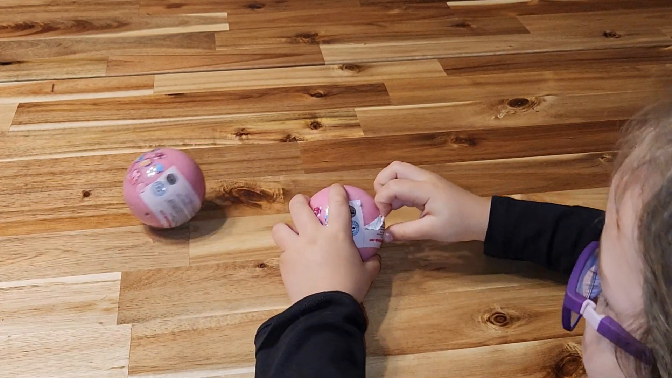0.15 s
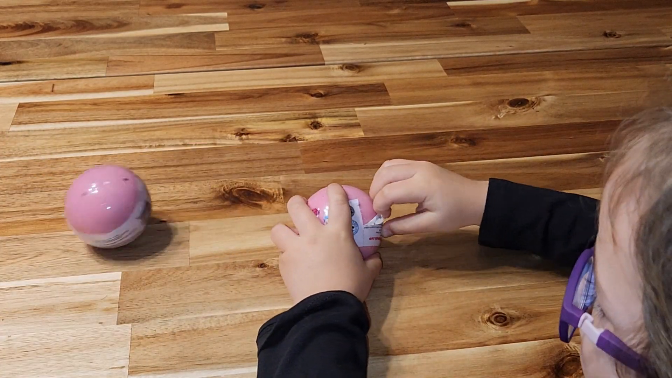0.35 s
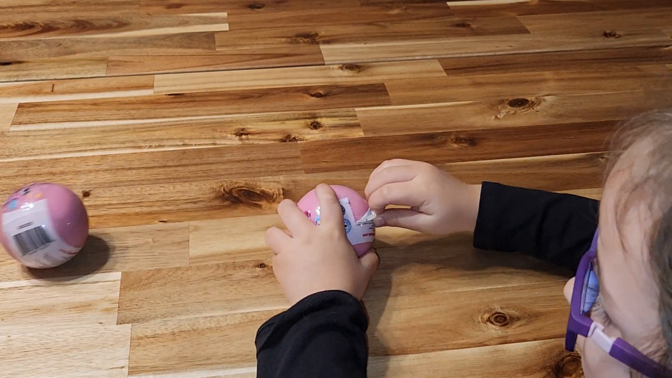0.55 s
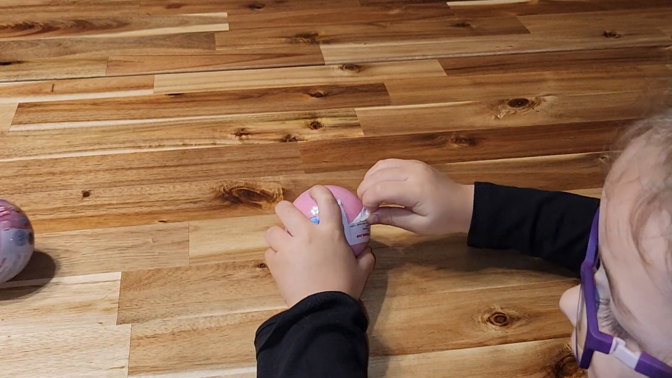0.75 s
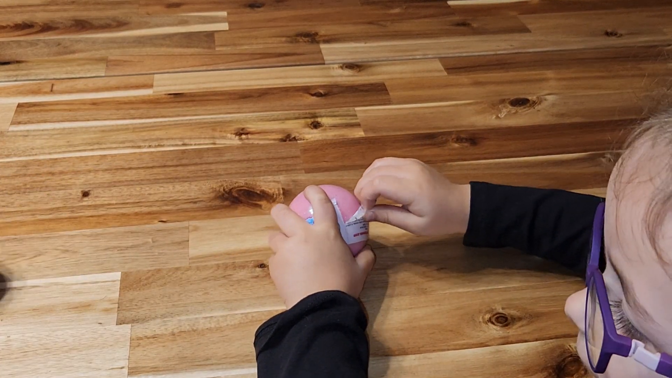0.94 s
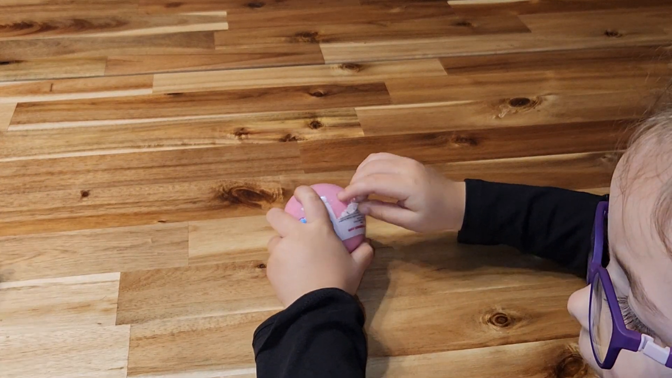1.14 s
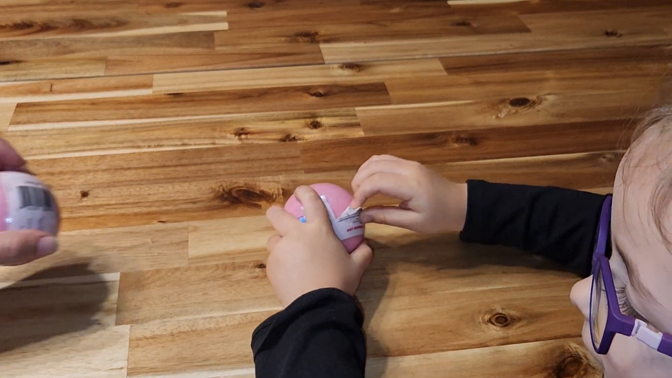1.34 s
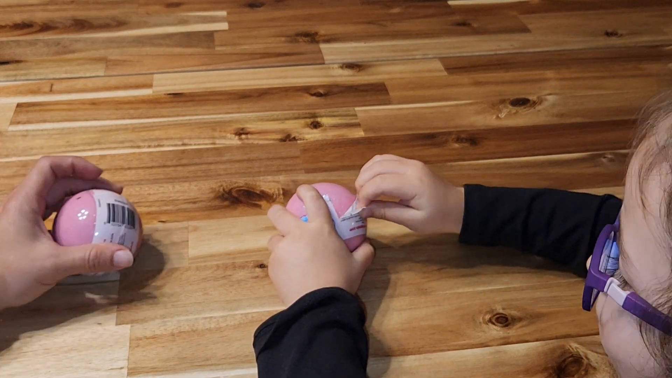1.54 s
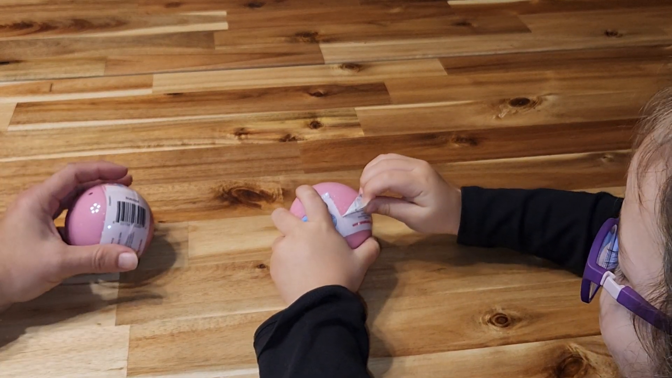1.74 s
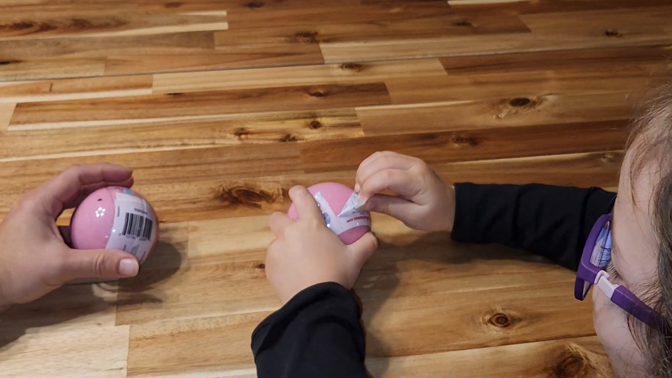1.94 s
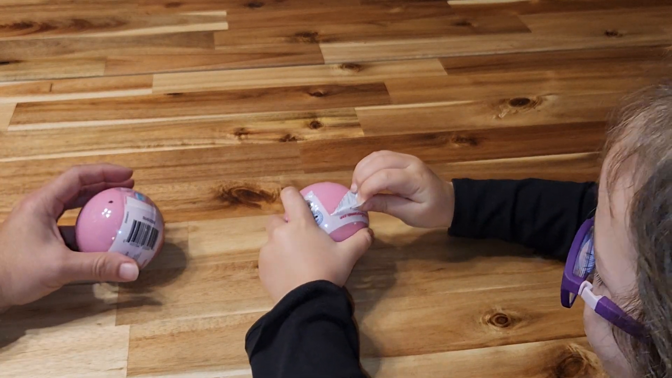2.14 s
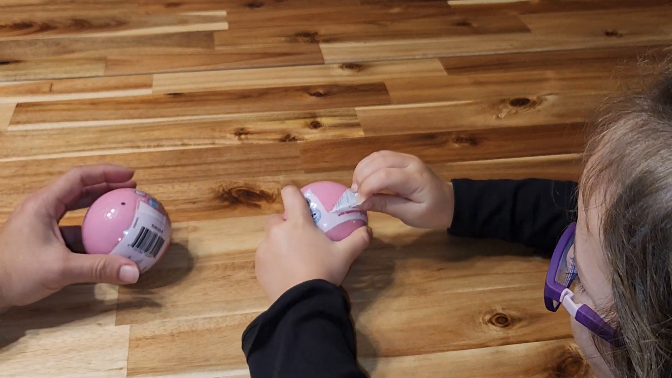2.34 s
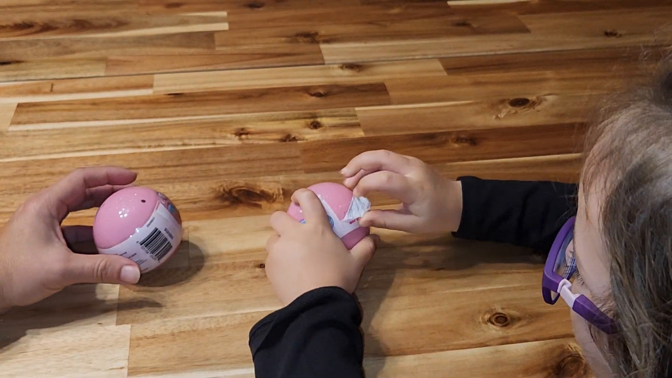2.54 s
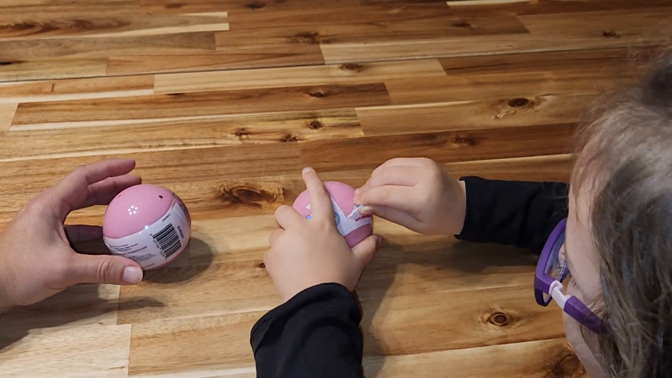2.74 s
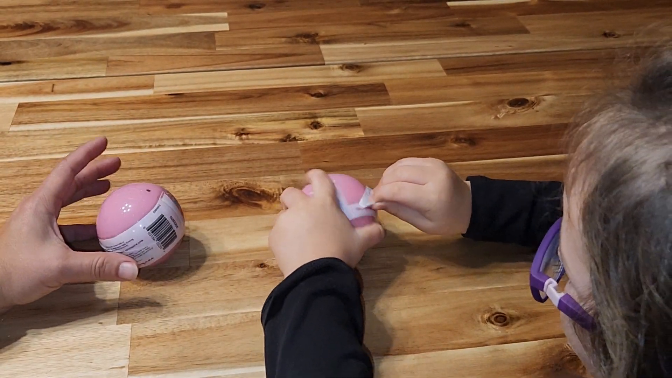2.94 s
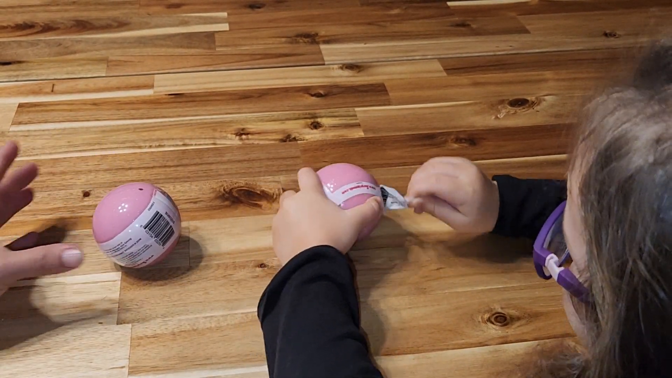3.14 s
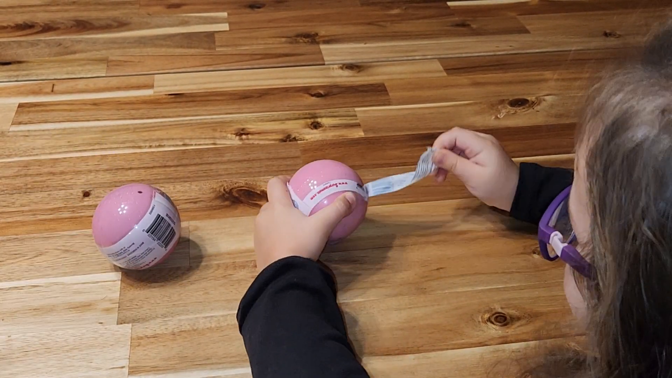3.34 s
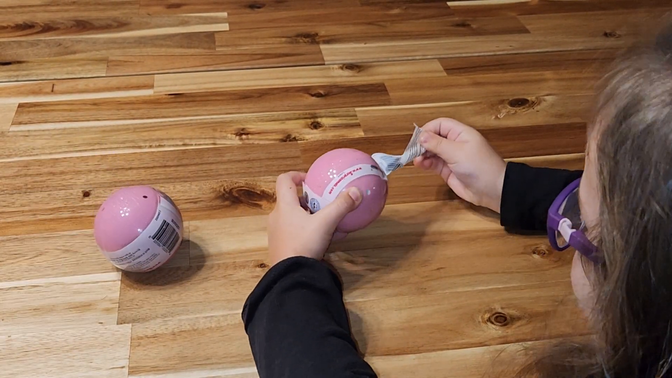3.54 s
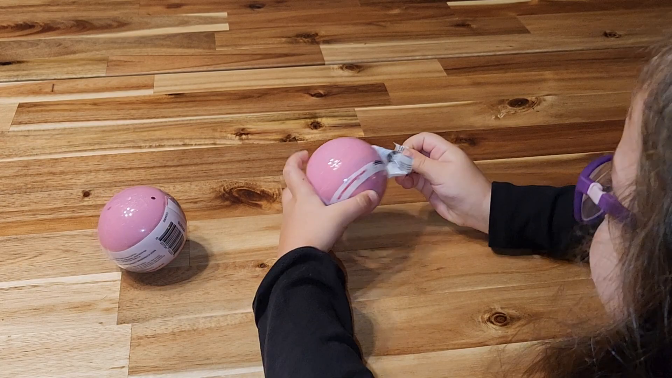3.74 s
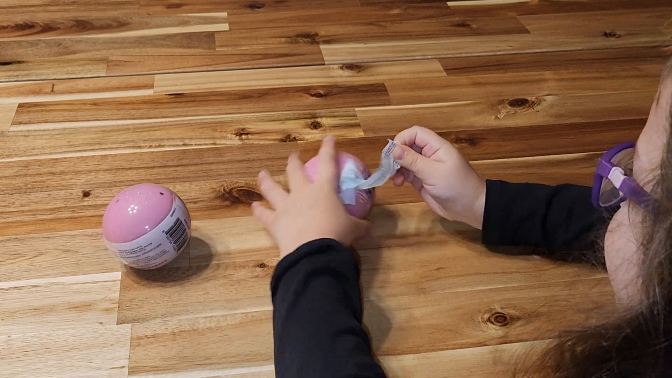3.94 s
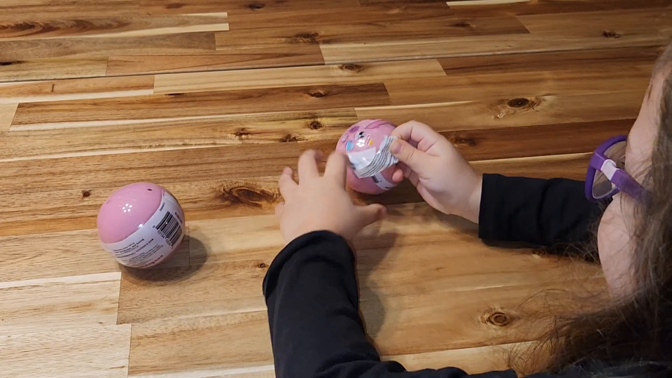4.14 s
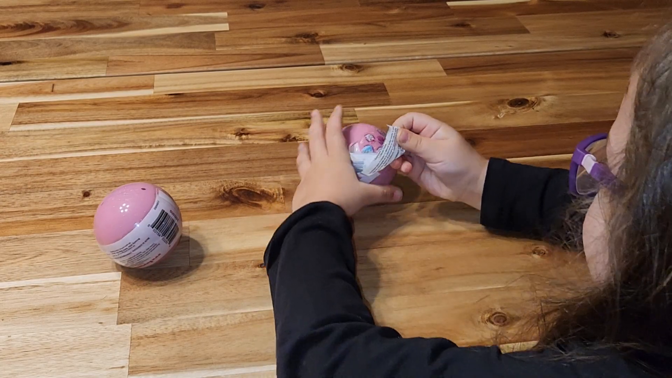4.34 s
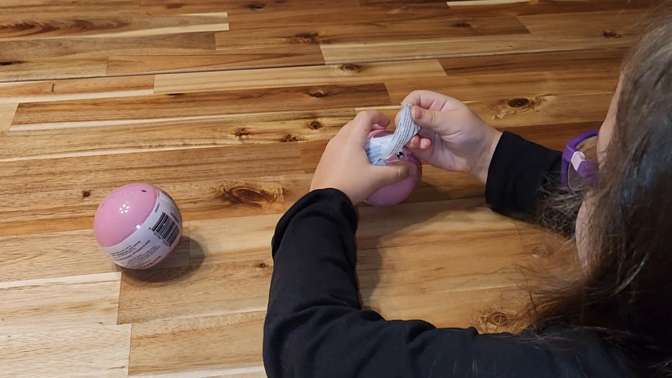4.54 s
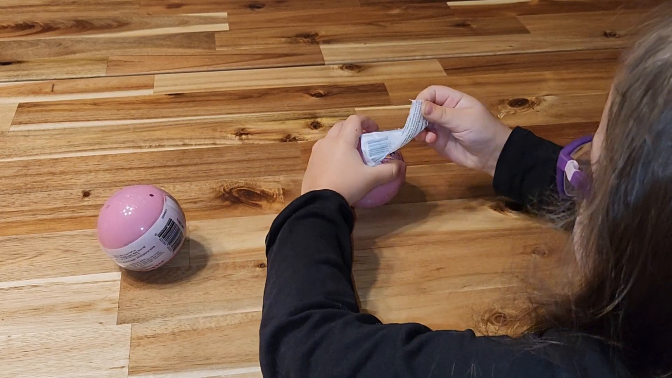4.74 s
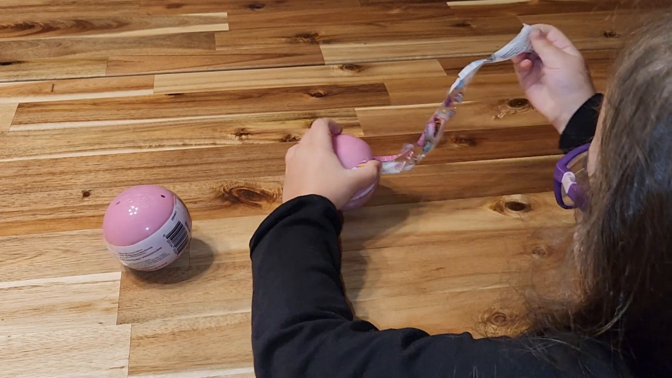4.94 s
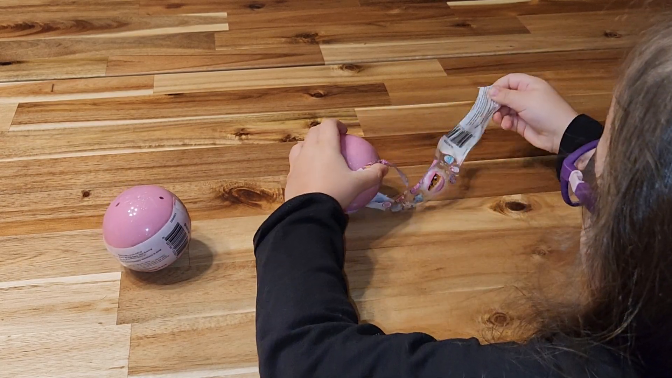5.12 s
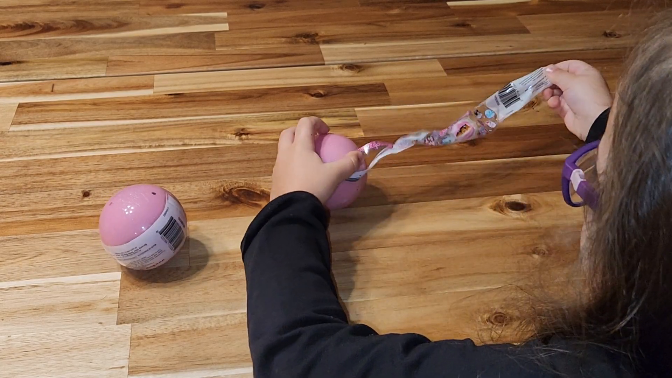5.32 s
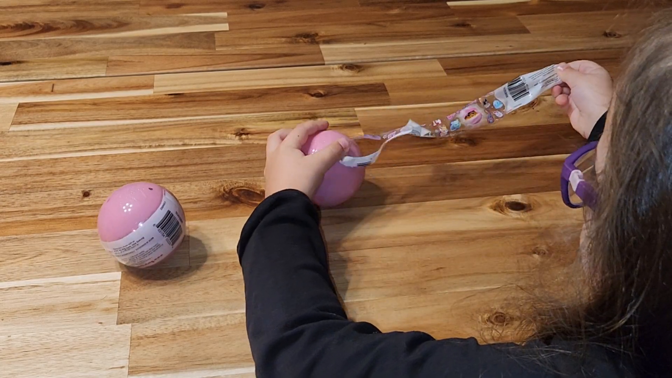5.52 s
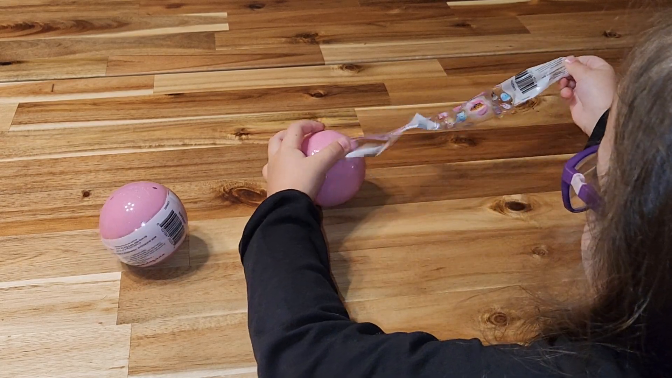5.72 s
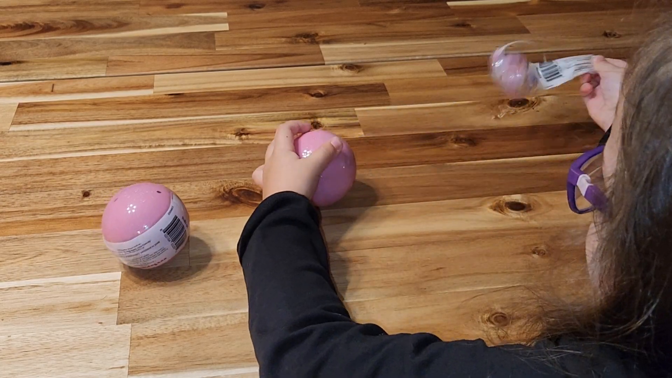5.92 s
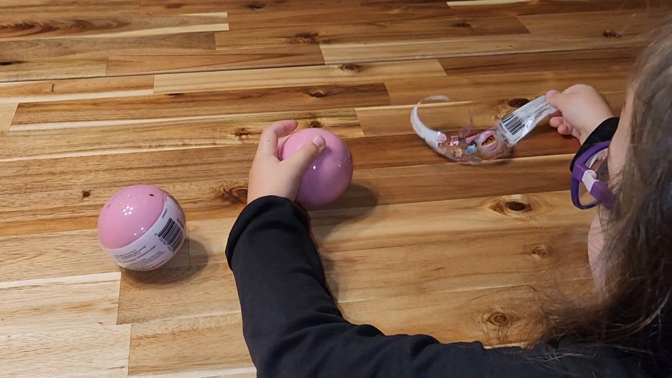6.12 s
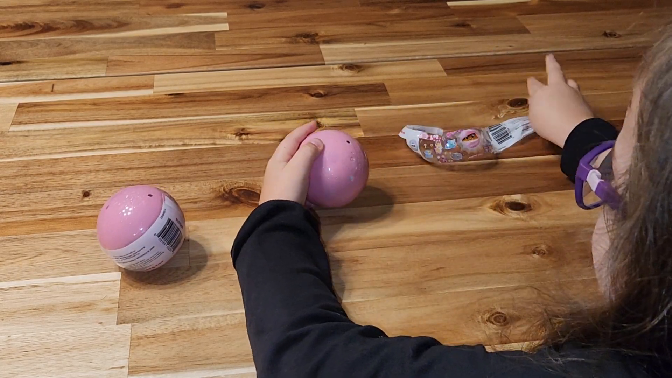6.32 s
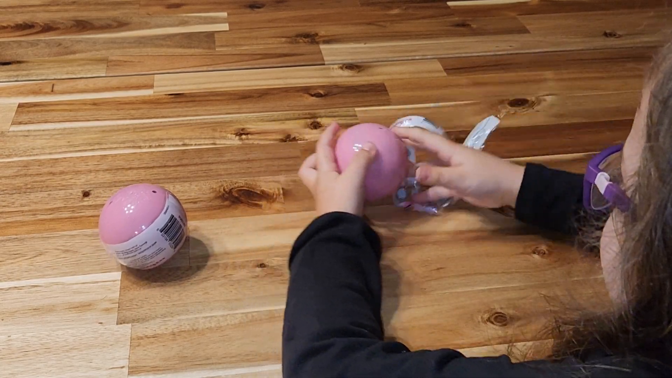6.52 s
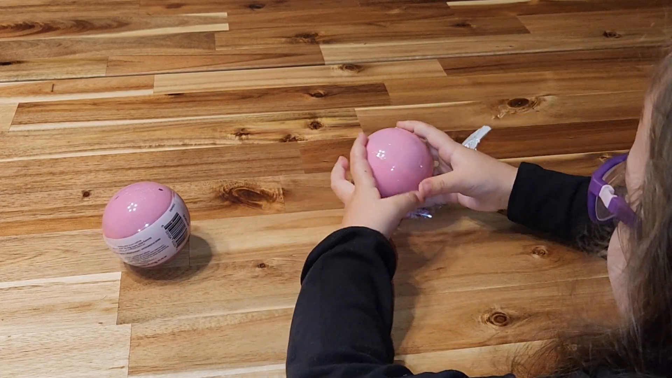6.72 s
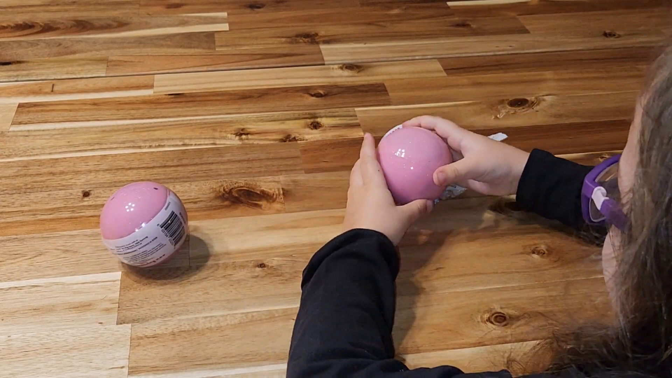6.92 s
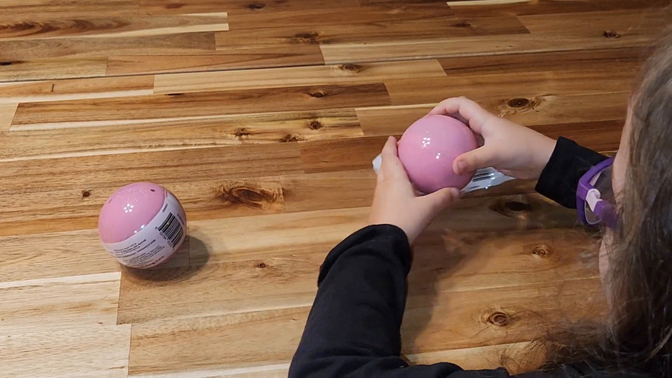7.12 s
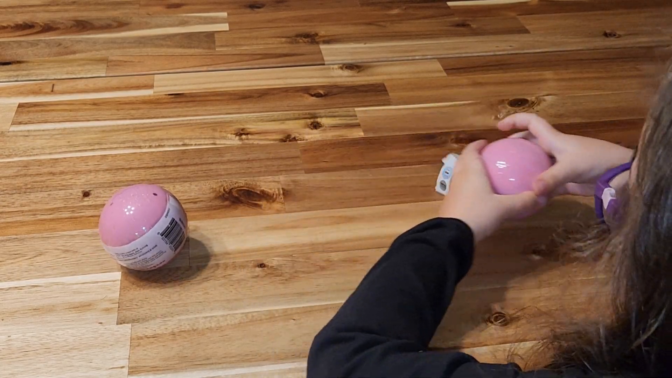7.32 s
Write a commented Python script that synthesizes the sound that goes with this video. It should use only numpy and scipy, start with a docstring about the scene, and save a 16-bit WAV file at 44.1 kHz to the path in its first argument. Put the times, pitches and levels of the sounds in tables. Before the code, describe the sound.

Thin stiff wrapper is peeled from a plastic ball on a wooden table. Dry, bright ticks are scattered at first, then crackles and rustles crowd together in several pulls, with hollow shell knocks among them. The loudest tear comes late, followed by lighter crinkling. Near microphone, short room reflections, faint low hum and soft floor thumps.

```python
"""Stiff plastic film snaps, crackles and rustles as small hands peel it off a hollow toy capsule on a wooden table.
Snaps and crackles are short noise bursts in three ringing bands; the rustle is patchy, fluttering noise.
Knocks ring the modes of shell and table top; a second capsule rolls faintly as a wavering narrow band.
A small room answers with single echoes and a tail; slow floor thumps and a quiet hum lie underneath.
A two-port microphone hears it all up close."""
import sys
import numpy as np
from scipy import signal
from scipy.io import wavfile
from scipy.ndimage import uniform_filter1d

SR = 44100
rng = np.random.default_rng(int(sys.argv[2]) if len(sys.argv) > 2 else 0)


def to_wav(s):
    """Save 16-bit WAV."""
    ch = np.atleast_2d(s).T  # columns
    pcm = np.round(np.clip(ch, -1, 1) * 32767)  # PCM
    wavfile.write(sys.argv[1], SR, pcm.astype(np.int16))


N = 325017  # samples in the scene

# The clearest buckles and tears of the film, part levels against the middle part:
# (time [s], peak level [dB], low part [dB], top part [dB], low ring [Hz], middle ring [Hz])
SNAPS = [(0.1456, -35.5, -17, 29, 3000, 7550), (0.3177, -48, 0, 0, 2180, 5530),
         (0.4325, -7, -26, 13.5, 3120, 4380), (0.438, -26.5, -14, 4.5, 3060, 5400),
         (0.4492, -23, -22, 24, 3180, 5350), (0.5477, -34.5, -6, 24, 1300, 8050),
         (0.9563, -22, -15, 13, 1980, 7950), (1.258, -16, -5.5, 2, 1080, 4200),
         (1.2603, -19.5, -7.5, -11, 1000, 7410), (1.499, -46.5, -12, -23, 2350, 5460),
         (1.5643, -40, -11, 4, 2380, 3550), (1.6066, -13.5, -7, 13.5, 3220, 3670),
         (1.7859, -19.5, -15, -1, 2200, 6700), (1.8679, -19.5, -7, 5.5, 2180, 6250),
         (1.9358, -13, -6.5, 13.5, 2130, 6160), (2.0651, -11, -13, 10.5, 1810, 6100),
         (2.141, -21, -3, 6, 3010, 3280), (2.1693, -28, -12, 0, 2960, 8250),
         (2.1861, -14.5, 0, 4.5, 2800, 7120), (2.5027, -45, 6, -13, 2770, 7610),
         (2.5115, -45, 4, -12, 2810, 7630), (2.5327, -31, -10, 10, 2780, 8400),
         (2.5721, -39, -8, 5, 3200, 3530), (2.6053, -36, -5, -3, 3200, 6940),
         (2.6114, -34, -4, -3, 1480, 4100), (2.6165, -29, -4, 5, 1560, 6380),
         (2.6396, -23, -11, 3.5, 1420, 7550), (2.7287, -26, -7.5, -7, 1810, 5760),
         (2.7914, -39.5, -8, 3, 2190, 7870), (2.8422, -17.5, -17, -4, 3060, 7060),
         (3.0459, -25.5, -14, 10, 2950, 7600), (3.0517, -22, -15, 11, 1940, 3730),
         (3.076, -17.5, -16, -2, 1720, 5500), (3.0853, -11.5, -18, 2, 3060, 5000),
         (3.0924, -5.5, -4.5, 2, 1680, 5670), (3.1131, -7, -6.5, -2, 1510, 6470),
         (3.1154, -5.5, -7.5, 1, 2080, 6550), (3.132, -14, -5, -9, 1410, 6970),
         (3.1371, -5.5, -8, -5, 1560, 5200), (3.142, -13.5, -8, -2, 1410, 6220),
         (3.1806, -18.5, -26, -2, 2140, 3680), (3.198, -19, -14, -4, 2920, 7540),
         (3.2124, -23, -13, -5, 1660, 4990), (3.239, -22.5, -10, -13, 1570, 7200),
         (3.2417, -16.5, -15, -10, 1310, 6060), (3.2512, -26, -4, -6, 2090, 5190),
         (3.2627, -27, 0, 9, 1520, 5210), (3.2902, -26.5, -6, 4, 1270, 5520),
         (3.3148, -26.5, -3, 0, 1560, 7540), (3.3702, -23.5, -11, -16, 1680, 6300),
         (3.3854, -20, -12.5, -16, 1570, 7000), (3.4075, -17.5, -8, -12, 1740, 5900),
         (3.4404, -17.5, -6, -6, 1800, 5340), (3.477, -13, 0, 6.5, 2000, 4170),
         (3.5008, -27, 0, -3, 1640, 5260), (3.5232, -23, -22, -6, 1690, 5550),
         (3.5708, -27.5, -25, -5, 1460, 7000), (3.5872, -32, -8, -3, 2990, 3330),
         (3.6558, -43.5, 3, -13, 1720, 3330), (3.7365, -36.5, -9, -13, 1710, 6630),
         (3.7834, -13.5, -4.5, 2.5, 1650, 6160), (3.804, -6, -8.5, 10.5, 2060, 6200),
         (3.8445, -22, -12, 7, 2100, 5160), (3.864, -21.5, -2.5, -1, 2080, 5770),
         (3.928, -26.5, -4, -1, 2170, 5300), (3.9424, -26, -8, -4, 2430, 6450),
         (3.9512, -14, -2.5, -13, 1130, 6150), (3.9681, -17.5, -13, -1, 1390, 4800),
         (3.972, -18.5, -7, -3, 1560, 5850), (3.99, -24, -10, 0, 1400, 5940),
         (4.0887, -20.5, -19, -16, 3130, 4600), (4.0976, -19, -29, 2, 1490, 6320),
         (4.1053, -12.5, -12, -11, 1620, 7460), (4.1507, -6.5, -6.5, 6.5, 3000, 6100),
         (4.218, -22.5, -23, -4, 1260, 7810), (4.237, -18.5, -17, -1, 2580, 6280),
         (4.2567, -12, -15, 1.5, 2900, 5730), (4.2776, -19.5, -8, 5, 3010, 4870),
         (4.2848, -13.5, -8.5, -5, 2920, 5800), (4.3393, -31, -10, 0, 1540, 7820),
         (4.4305, -21.5, -18, -3, 1850, 5060), (4.5097, -21.5, -11, 5, 1670, 5220),
         (4.5871, -29.5, -4, -13, 2010, 5550), (4.6092, -35, -5, -3, 3180, 5130),
         (4.6576, -28, -11, -13, 3140, 5800), (4.6934, -27.5, 3, -4, 2390, 5090),
         (4.7184, -34.5, -2.5, -2.5, 3180, 3310), (4.8285, -22.5, -9, -27, 2280, 6730),
         (4.864, -26, -9, -4, 1570, 3970), (4.8858, -21.5, -16, -7, 3090, 3300),
         (4.8901, -22, -4.5, -2.5, 2640, 5350), (4.9207, -2, -11.5, 4.5, 3100, 6100),
         (4.9456, -9, -12, 6, 3040, 5150), (4.9918, -8.5, -8, 3, 3000, 4850),
         (5.0003, -6.5, -6, -5, 2250, 7400), (5.0418, -8, -14, -18, 1680, 6700),
         (5.1101, -24, -8.5, 0, 1280, 5820), (5.1312, -26, -11, 0, 2340, 5590),
         (5.1911, -14, -37, -3, 3270, 5700), (5.2455, -22, -22, -22, 2100, 5500),
         (5.3388, -24, -11, -18, 2620, 4650), (5.3652, -29, -16, -10, 2260, 5640),
         (5.4106, -12, -34, -34, 2000, 6140), (5.447, -15.5, -12, 4.5, 2010, 3650),
         (5.4583, -19.5, -16, -4, 1220, 6200), (5.559, -14, -18, 11, 3030, 4770),
         (5.5638, -12.5, -15, 3, 2170, 6760), (5.665, -32.5, -14, 0, 1460, 6760),
         (5.6758, -30, -12.5, 0, 2010, 5350), (5.8192, -40.5, -4, -2, 2380, 5330),
         (5.8672, -11, -22, 3, 1570, 4860), (5.874, -12, -11, 5.5, 1960, 5650),
         (5.917, -18, -31, 7, 2150, 5080), (5.9388, -19, -13, -15, 2250, 4760),
         (6.0761, -38.5, -4, -9, 1230, 5350), (6.1378, -18, -7, -4, 2870, 6800),
         (6.2198, -33, 2, 0, 2770, 3320), (6.329, -25, -11, 9.5, 2820, 3660),
         (6.3883, -39, -10, 8, 3030, 3370), (6.414, -32.5, -5, 10, 3020, 4720),
         (6.562, -39, 1, 2, 2800, 5160), (6.6853, -21, -6, -1, 1500, 5560),
         (7.1766, -24, -5, 3.5, 2480, 5320), (7.185, -27.5, -8, 19, 2010, 5470)]
# Ring-down of a snap: (low part t60 [s], middle part t60 [s], top part t60 [s])
SNAP_T60 = (0.011, 0.0092, 0.012)
# Spectral width of a snap: (low part [octaves], middle part [octaves], top part [octaves])
RING_OCTAVES = (.2, .36, .42)
# Likeness of a snap at the two ports: (low part [0-1], middle part [0-1], top part [0-1])
PORTS_ALIKE = (1, 0.45, 0.73)
TOP_HZ = 11940  # centre of the top part
SNAP_LEFT_DB, SNAP_SCATTER_DB = 2.0, 1.4  # left minus right: mean and spread over the snaps

# Spells of pulling and fingering, top and low part against the middle part:
# (start [s], rise [s], hold [s], level [dB], top part [dB], low part [dB], share of separate crackles [0-1])
SPELLS = [(0, 0.0035, 0.097, -71, 10, 6, 1), (0.411, 0.0063, 0.079, -79, 30, 14, 1),
          (0.694, 0.0089, 0.024, -87, -2, -3, 0.6), (1.597, 0.017, 0.015, -45.5, 6, -3, 0.73),
          (1.773, .01, 0.012, -50, 3, -16, 0.2), (1.922, 0.011, .02, -50, 2, -24, .5),
          (2.075, .11, .03, -50.5, -21, -2.5, 0.23), (2.515, 0.11, 0.03, -56.5, -3, -13.5, 1),
          (2.824, 0.0087, .02, -55.5, -5, -14, 0.3), (3.045, 0.07, 0.045, -38, 2.5, 1.5, .5),
          (3.17, .02, 0.12, -47.5, 1, -3.5, .6), (3.36, 0.014, 0.13, -46, -2, -6, 1),
          (3.495, .02, .08, -57, -11, -3, 0.5), (3.6, .02, .08, -70, -16, 2, 0.3),
          (3.726, 0.05, 0.086, -48.5, -4, -7.5, 0.14), (3.907, 0.048, 0.037, -48, -2.5, 4, 1),
          (4.075, 0.024, 0.054, -45.5, -3, -1.5, 0.6), (4.187, 0.084, 0.015, -45, 3, 2, .4),
          (4.43, 0.014, 0.31, -64, 0.5, -0.5, 0.87), (4.816, 0.016, 0.11, -56, 5.5, 4, 1),
          (4.917, 0.0081, 0.11, -32, -4.5, -3.5, 0.24), (5.075, 0.018, 0.1, -49.5, 0.5, -6.5, 0.6),
          (5.312, 0.028, .11, -46, 1, -2.5, 0.58), (5.539, .015, 0.024, -51.5, 9.5, 1.5, .8),
          (5.784, 0.045, .05, -70, 12, -3, 0.5), (5.861, 0.0044, 0.073, -43.5, -2.5, -9, 0.02),
          (6.035, 0.02, 0.032, -59, 0, -1, 0.84), (6.127, 0.0086, 0.14, -55, -4, -1, 0),
          (6.303, 0.015, 0.062, -52, 0, -6, .1), (6.45, 0.028, .09, -71, -5, -2, 0.1),
          (6.553, .01, 0.12, -46, 0.5, -7.5, 0.78), (6.75, 0.014, .02, -57, -9, -12, .4),
          (6.888, 0.012, 0.023, -62.5, 1.5, -18, .4), (7.04, .05, .03, -66.5, 4, -4, .3),
          (7.119, 0.15, 0.016, -52, -1, -2.5, 0), (7.334, 0.0082, 0.011, -52.5, -10, 7.5, 0)]
# A spell starts 16 dB down, swells to its level, then dies away evenly
RISE_FROM_DB, SETTLE_DB_PER_S = -16, 296.5
CRACKLES_PER_S = 900  # on average
# Centres of the rustle: (low part [Hz], middle part [Hz])
RUSTLE_HZ = (2300, 5440)

# The capsule meets the table: (time [s], peak level [dB], hardness [dB per octave])
KNOCKS = [(.7, -34, -1.5), (1.257, -18.5, 17.5), (1.625, -18, 1), (3.143, -24, 6.5), (3.411, -34, -10),
          (3.803, -38, -16), (3.952, -14.5, -1.5), (4.105, -32, -9.5), (4.153, -24.5, 5),
          (4.336, -38.5, -16), (4.921, -24, 9), (5.001, -27, 2), (5.041, -26.5, 10), (5.247, -32.5, 22.5),
          (5.446, -38.5, -4)]
# Modes of shell and table top, before each blow varies them: (frequency [Hz], level [dB], t60 [s])
CAPSULE = [(117, -10, 0.028), (165, -20.5, 0.18), (254, -12.5, 0.086), (410, -4, 0.21), (470, 5.5, 0.032),
           (606, 10.5, 0.11), (705, 3, 0.023), (902, 13, 0.018), (1100, 5, 0.011), (1420, -6, .025),
           (1750, -7, .02), (2200, -12.5, 0.037)]
# The second capsule rolls over the boards: (time [s], level [dB], ring [Hz])
ROLL = [(0, -76, 2300), (.3, -63, 2150), (.41, -68.5, 2050), (.5, -78.5, 2100), (.9, -72, 1980)]

# Dull low thumps through the floor: (time [s], envelope peak [dB], frequency [Hz])
THUMPS = [(.715, -46.5, 29), (1.044, -36, 27.6), (2.078, -45, 49.7), (4.771, -41.5, 38.5)]
# Spectral shape of the hum, relative: (frequency [Hz], density [dB per Hz])
HUM = [(11, -48.5), (18, -18), (59, 5.5), (114, -5.5), (170, -2.5), (366, -8), (486, -14), (645, -13.5),
       (1110, -22.5), (1240, -17.5), (1700, -24), (3870, -24), (7640, -28.5), (14700, -36), (16000, -39.5)]
HUM_DB = -53.5  # rms level of the hum before panning
# Hum at the two ports: (frequency [Hz], left-right likeness [-1 to 1])
HUM_SAME = [(60, 0.97), (180, 0.99), (550, 0.7), (1650, 0.086), (4970, 0.02), (15000, 0.07)]

# Single echoes, before the three turning tails weight them: (delay [ms], left level [dB], right level [dB])
ECHOES = [(1.328, -28.5, -24), (5.583, -16, -21), (7.27, -13, -33.5), (8.16, -45.5, -37.5),
          (9.39, -16.5, -21), (11.43, -27, -20), (17.14, -19, -27), (33.62, -23, -23)]
# Decay of the room tail: (frequency [Hz], t60 [s])
ROOM = [(200, 0.3), (800, 0.27), (2000, 0.32), (5500, 0.26), (15000, 0.2)]
# Strength of the room tail: (frequency [Hz], energy against the direct sound [dB])
ROOM_DB = [(200, 0.5), (1000, -5.5), (4000, -4), (15000, -10)]
# Room tail at the two ports: (frequency [Hz], left-right likeness [-1 to 1])
ROOM_SAME = [(100, 1), (250, 1), (600, 0.74), (1500, -0.68), (4000, -0.42), (12000, 0.88)]

# Colour of the microphone: (frequency [Hz], gain [dB])
MICROPHONE = [(800, 0), (1500, -0.5), (2500, -2.5), (4000, -2.5), (6000, -1.5), (9000, -3.5), (12000, -3),
              (15750, -3), (16150, -22)]
LEFT_LEAD_S = 2.4e-5  # the left port is nearer to the hands
EDGE_HZ = 16900  # band limit
FULL_SCALE = .92  # ceiling of the input stage


def snaps():
    """Each buckle of the film flips over at once; the two ports see it from slightly different sides."""
    out = np.zeros((2, N))
    low_hz, middle_hz = np.transpose(SNAPS)[4:6]
    alike = np.clip(PORTS_ALIKE, 0, 1)[:, None, None]
    left = snap_shapes(low_hz, middle_hz)
    right = alike * left + np.sqrt(1 - alike ** 2) * snap_shapes(low_hz, middle_hz)
    pans_db = SNAP_LEFT_DB + SNAP_SCATTER_DB * rng.standard_normal(len(SNAPS))
    for k, (s, peak_db, low_db, top_db, _, _) in enumerate(SNAPS):
        share = gain_of([low_db, 0, top_db])
        burst = np.array([share @ left[:, k], share @ right[:, k]]) / np.linalg.norm(share)
        add(out, s, placed(gain_of(peak_db) * burst, pans_db[k]))
    return out


def snap_shapes(low_hz, middle_hz):
    """Bursts that start within about a millisecond and ring at their crease: three parts x events x samples."""
    t = np.arange(800) / SR
    noise = rng.standard_normal((len(low_hz), 800))
    centres = [low_hz, middle_hz, TOP_HZ + 0 * low_hz]
    onset = 1 - np.exp(-(t / 0.00032) ** 2)
    shapes = []
    for hz, octaves, t60 in zip(centres, RING_OCTAVES, SNAP_T60):
        burst = coloured(noise, hz, octaves) * onset * gain_of(-60 * t / t60)
        short_power = uniform_filter1d(2 * burst ** 2, size=30)
        shapes.append(burst / np.sqrt(short_power.max(-1, keepdims=True)))
    return np.array(shapes)


def handling():
    """Skin and film slide with a rustle while tiny creases, each with its own colour, crackle at random."""
    crackling, gliding = np.sqrt(spell_powers())
    size = gain_of(3.6 * np.minimum(rng.exponential(1, N), 4))
    size = size * (rng.random(N) < CRACKLES_PER_S / SR)
    crease = rng.integers(0, 24, N)  # which of 24 creases gives way
    low_hz = np.geomspace(1200, 2900, 24)
    middle_hz = rng.permutation(np.geomspace(3300, 7800, 24))
    shapes = snap_shapes(low_hz, middle_hz)
    shapes = shapes * gain_of(1.33 * rng.standard_normal((3, 24, 1)))
    sliding, out = rustle(patchy_db=3.0, flutter_db=4.5), np.zeros(N)
    for k, hz in enumerate(RUSTLE_HZ + (TOP_HZ,)):
        crackle = sum(signal.oaconvolve(size * (crease == c), shapes[k, c])[:N] for c in range(24))
        soft = coloured(sliding, hz, octaves=.5)[:N]
        out += crackling[k] * evened(crackle) + gliding[k] * soft
    return placed(out, pan_db=2.0)


def spell_powers():
    """Summed power of all spells, split by grain: crackle and slide x three parts x samples."""
    out, t = np.zeros((2, 3, N)), np.arange(SR) / SR
    for s, rise, hold, level_db, top_db, low_db, grain in SPELLS:
        rise, grain = max(rise, 1 / SR), np.clip(grain, 0, 1)
        swell_db = RISE_FROM_DB * np.maximum(1 - t / rise, 0)
        settle_db = -SETTLE_DB_PER_S * np.maximum(t - rise - hold, 0)
        parts_db = level_db + np.array([[low_db], [0], [top_db]])
        parts = gain_of(parts_db + swell_db + settle_db) ** 2
        add(out, max(s, 0), np.array([grain * parts, (1 - grain) * parts]))
    return out


def rustle(patchy_db, flutter_db):
    """Sliding noise whose colour shifts in patches and whose level flutters."""
    z = signal.stft(rng.standard_normal(N + 512), nperseg=256)[2]
    patches = uniform_filter1d(rng.standard_normal(z.shape), size=16, axis=1)
    patches = uniform_filter1d(patches, size=7, axis=0)
    flutter = uniform_filter1d(rng.standard_normal(z.shape[1]), size=6)
    z = z * gain_of(patchy_db * patches / patches.std() + flutter_db * evened(flutter))
    return signal.istft(z, nperseg=256)[1][:N + N % 2]  # an even length


def knocks():
    """A blow with a brief rattle rings shell and table top; a hard blow favours the upper modes."""
    out, t = np.zeros(N), np.arange(SR // 5) / SR
    for s, peak_db, hard_db in KNOCKS:
        hz, db, t60 = np.transpose(CAPSULE)[..., None]
        spot_db, grip = rng.standard_normal((2, len(hz), 1))  # every blow lands on another spot, in another grip
        hz = hz * (1 + .04 * grip)
        db = db + 3 * spot_db + hard_db * np.log2(hz / 500)
        modes = gain_of(db - 60 * t / t60) * np.sin(2 * np.pi * hz * t)
        blow = modes.sum(0)
        hits = rng.standard_normal(900) * (rng.random(900) < .03)
        rattle = 0.52 * hits * gain_of(-60 * t[:900] / 0.06)
        ring = blow + np.convolve(blow, rattle)[:len(t)]
        add(out, s, gain_of(peak_db) * ring / abs(ring).max())
    low_cut = signal.butter(N=2, Wn=80, btype="high", fs=SR, output="sos")
    radiated = signal.sosfilt(low_cut, out)
    return placed(radiated, pan_db=1.0)


def roll():
    """The grain of the wood shakes the rolling shell, which answers with a faint, wavering ring."""
    s, *columns = np.transpose(ROLL)
    level_db, hz = (np.interp(np.arange(N) / SR, s, c) for c in columns)
    bandwidth_hz = 150
    pole = np.exp(-np.pi * bandwidth_hz / SR)
    slow = signal.lfilter([1], [1, -pole], rng.standard_normal((2, N)))
    carrier = np.exp(2j * np.pi * np.cumsum(hz) / SR)
    ring = ((slow[0] + 1j * slow[1]) * carrier).real
    return placed(gain_of(level_db) * evened(ring), pan_db=3)


def thumps():
    """A few slow swings through the floor that swell for about one cycle and die away."""
    out, t = np.zeros(N), np.arange(SR // 2) / SR
    for s, peak_db, hz in THUMPS:
        u = t * hz / 1.05  # 1 at the envelope peak
        envelope = u * np.exp(1 - u)
        add(out, s, -gain_of(peak_db) * envelope * np.sin(2 * np.pi * hz * t))
    return out


def hum():
    """Steady room and microphone noise, slightly patchy, alike in both ports at the bottom."""
    frames, hz = N // 512 + 5, np.fft.rfftfreq(2048, 1 / SR)
    a, b, c, d, patches = rng.standard_normal((frames, 1025, 5)).T
    patches = uniform_filter1d(uniform_filter1d(patches, size=12, axis=0), size=8, axis=1)
    same = np.clip(read(HUM_SAME, hz), -1, 1)[:, None]
    left, other = a + 1j * b, c + 1j * d
    z = np.array([left, same * left + np.sqrt(1 - same ** 2) * other])
    z *= gain_of(read(HUM, hz)[:, None] + 1.1 * patches / patches.std())
    noise = signal.istft(z, nperseg=2048, noverlap=1536)[1][:, :N]
    return placed(gain_of(HUM_DB) * evened(noise), pan_db=1.4)


def room(x):
    """Direct sound reaches the left port first; three tails take turns smoothly: echoes waver 4.3 times a second."""
    even = N + N % 2
    hz = np.fft.rfftfreq(even, 1 / SR)
    delay = np.exp(-2j * np.pi * hz * LEFT_LEAD_S)
    right = np.fft.irfft(np.fft.rfft(x[1], even) * delay)[:N]
    turn = np.pi * np.arange(N) / SR * 4.3
    turns = [np.sqrt(2 / 3) * abs(np.cos(turn + k * np.pi / 3)) for k in range(3)]  # squares sum to 1
    echoes = sum(signal.fftconvolve((w * x.mean(0))[None], room_tail(), axes=1)[:, :N] for w in turns)
    return np.array([x[0], right]) + echoes


def room_tail():
    """Single echoes up to 34 ms, joined from 5 ms by sparse random taps that die band by band, alike at the bottom."""
    size, first, gap = SR // 2, 220, 12  # samples
    taps = np.zeros((2, size))
    slots = np.arange(first, size - gap, gap)
    at = slots + rng.integers(0, gap, (2, len(slots)))
    np.put_along_axis(taps, at, rng.choice([-1., 1.], at.shape), 1)
    hz, t, z = signal.stft(taps, SR, nperseg=512)
    same = np.clip(read(ROOM_SAME, hz), -1, 1)[:, None]
    t60 = read(ROOM, hz)[:, None]
    z = np.array([z[0], same * z[0] + np.sqrt(1 - same ** 2) * z[1]])
    z *= gain_of(-60 * t / t60)
    z *= gain_of(read(ROOM_DB, hz))[:, None] / np.sqrt(t60)
    tail = signal.istft(z, SR, nperseg=512)[1][:, :size]
    tail *= np.sqrt(gap * 6 * np.log(10) / SR)  # tap density and decay turned into energy
    tail[:, :first] = 0
    for ms, *db in ECHOES:
        at = round(ms * SR / 1000) + rng.integers(0, 4, 2)  # the ports hear a wall up to 3 samples apart
        tail[[0, 1], at] += gain_of(db)
    return tail


def coloured(noise, centre_hz, octaves):
    """Keeps a bell-shaped band of each row of noise."""
    hz = np.fft.rfftfreq(noise.shape[-1], 1 / SR) + 1
    away = np.log2(hz / np.asarray(centre_hz)[..., None]) / octaves
    bell = np.exp(-.5 * away ** 2) + 0.33 * np.exp(-.5 * (away / 4) ** 2)  # a peak on a broad foot
    return evened(np.fft.irfft(np.fft.rfft(noise) * bell, noise.shape[-1]))


def gain_of(db):
    """Decibels to a factor."""
    return 10 ** (np.asarray(db) / 20)


def evened(x):
    """Scales the last axis to rms 1."""
    return x / np.sqrt(np.mean(x ** 2, -1, keepdims=True) + 1e-20)


def read(points, hz):
    """Reads a (frequency [Hz], value) table on a log axis."""
    f, value = np.transpose(points)
    return np.interp(np.log(hz + 1), np.log(f + 1), value)


def add(mix, s, sound):
    """Mixes a sound in from time s."""
    part = mix[..., round(s * SR):][..., :sound.shape[-1]]
    part += sound[..., :part.shape[-1]]


def placed(x, pan_db):
    """Pans a sound by a left-minus-right level difference."""
    return x * gain_of([[pan_db / 2], [-pan_db / 2]])


def scene():
    """Film and capsules sound into the room; thumps and hum join without its echoes."""
    return room(snaps() + handling() + knocks() + roll()) + thumps() + hum()


def record(dry):
    """Microphone colour, an input stage that rounds off the highest peaks, then the band limit."""
    hz = np.linspace(0, SR / 2, 257)
    colour = signal.firwin2(255, hz, gain_of(read(MICROPHONE, hz)), fs=SR)
    heard = signal.oaconvolve(dry, colour[None], "same")
    heard = FULL_SCALE * np.tanh(heard / FULL_SCALE)
    band_limit = signal.firwin(255, EDGE_HZ, window=("kaiser", 9), fs=SR)
    return signal.oaconvolve(heard, band_limit[None], "same")


dry = scene()
out = record(dry)
to_wav(out)
```